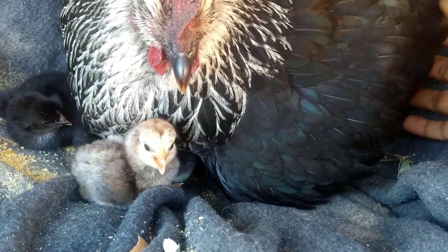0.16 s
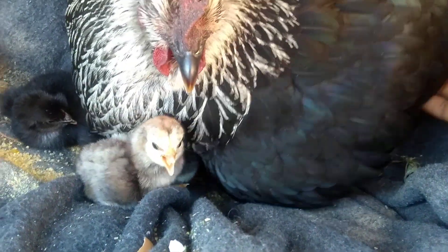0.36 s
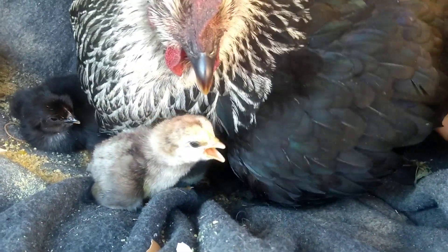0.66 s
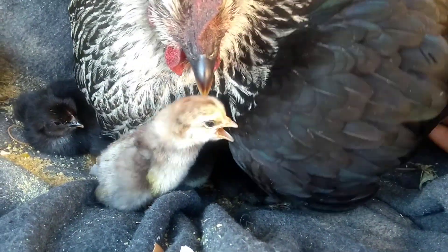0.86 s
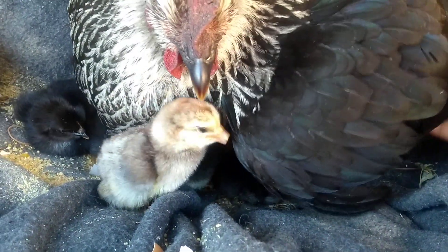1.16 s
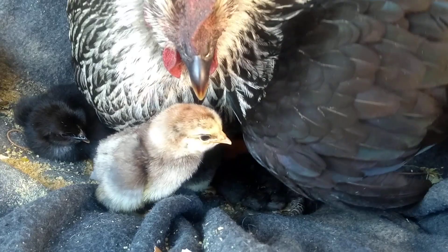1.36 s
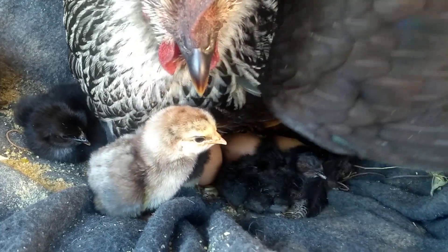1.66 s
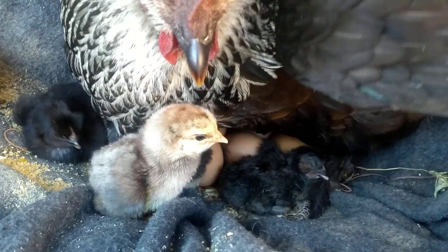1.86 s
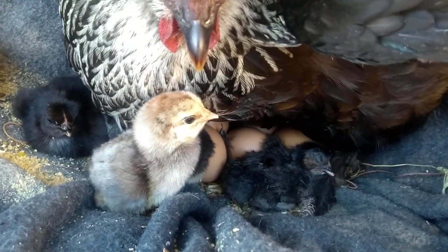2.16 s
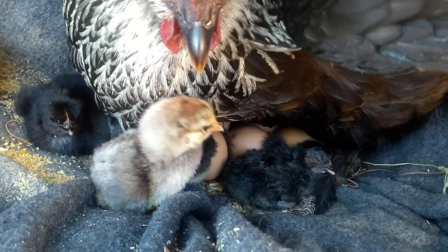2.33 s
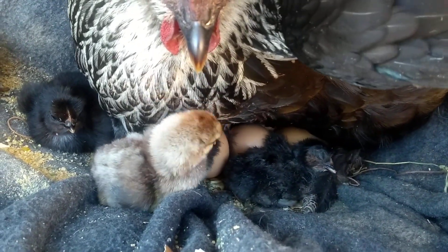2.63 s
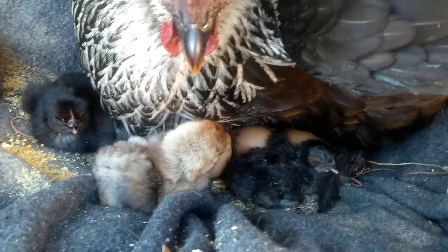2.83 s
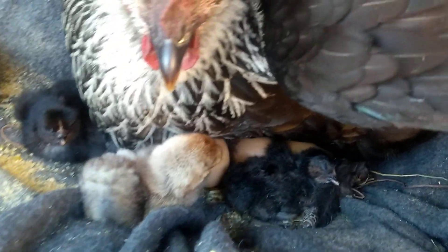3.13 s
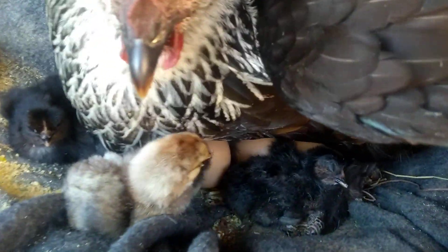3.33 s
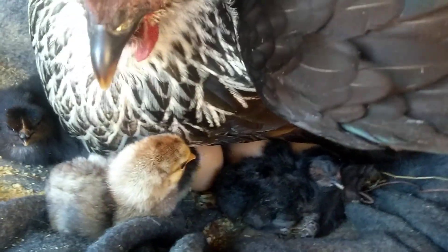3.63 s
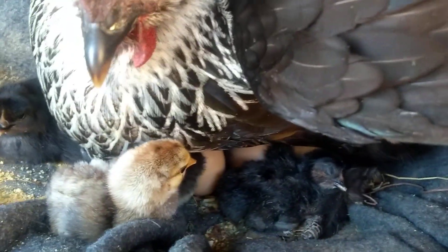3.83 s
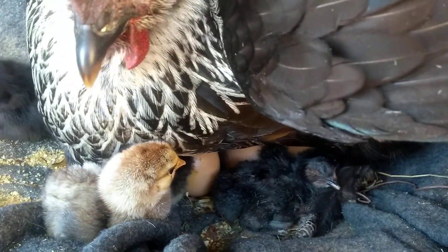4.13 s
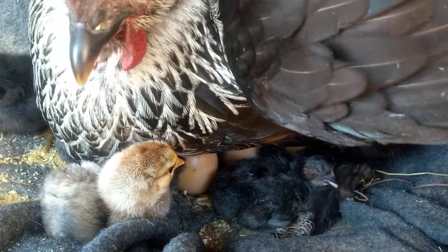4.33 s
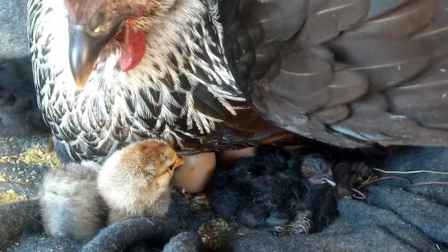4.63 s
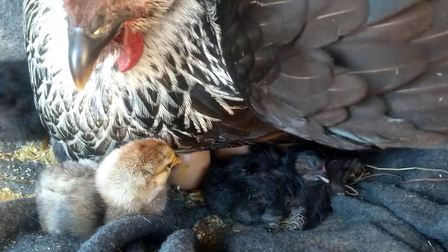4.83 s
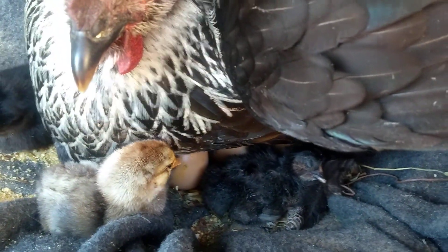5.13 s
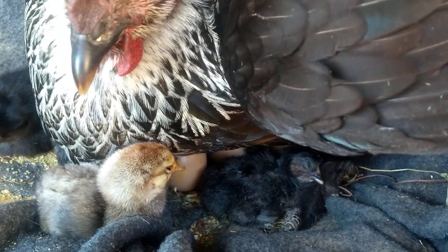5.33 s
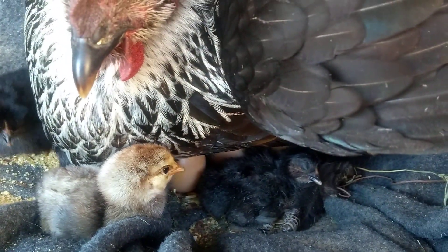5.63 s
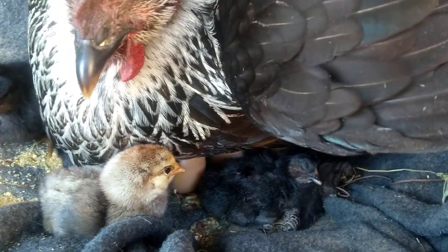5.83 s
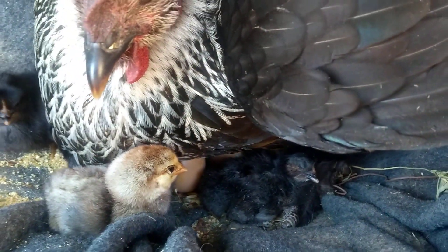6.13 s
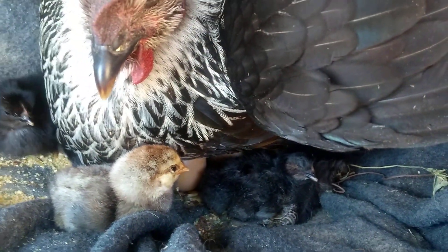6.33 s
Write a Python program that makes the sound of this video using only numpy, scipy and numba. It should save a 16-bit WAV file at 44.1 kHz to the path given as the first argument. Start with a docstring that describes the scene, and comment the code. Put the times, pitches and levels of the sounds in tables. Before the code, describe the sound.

A hen growls five times up close, rough and fluttering, with faint feather rustles and a few tiny chick peeps.

```python
"""Broody hen growling on a blanket

A hen growls five times, close to a phone, while her wing is lifted off her chicks. Each growl is a
train of soft pulses that ring her throat, their rate swinging up and down about 50 times a second.
Feathers rustle in a quiet room, a chick peeps, something nudges the phone, a bird calls far off.
The phone widens the sound of its two ports."""
import sys
import numpy as np
from scipy import signal
from scipy.fft import rfft, irfft, next_fast_len
from scipy.io import wavfile
from scipy.ndimage import uniform_filter1d
from numba import njit

SR = 44100
rng = np.random.default_rng(int(sys.argv[2]) if len(sys.argv) > 2 else 0)


def persist_wave(psi):
    """Save psi, clipped to +-1, as 16-bit WAV."""
    counts = np.round(np.clip(psi, -1, 1) * 32767).astype(np.int16)
    wavfile.write(sys.argv[1], SR, np.atleast_2d(counts).T)


N = 285768
T = np.arange(N) / SR
SIZE = next_fast_len(N + 16384)
FREQS = np.arange(SIZE // 2 + 1) * SR / SIZE
EASY_HZ, EASY_ROUGH = 699.5, 0.58  # top pulse rate and roughness of an easy growl


def undb(db):
    """Decibels to gain."""
    return 10 ** (np.asarray(db) / 20)


def curves(rows):
    """Table columns, interpolated over the times in the first."""
    times_s, *columns = np.transpose(rows)
    return [np.interp(T, times_s, column) for column in columns]


def gains(points):
    """Gain of a (Hz, dB) table at every frequency."""
    hz, db = np.transpose(points)
    return undb(np.interp(np.log(FREQS + 1), np.log(hz), db))


def through(x, response):
    """Filter by a frequency response."""
    return irfft(rfft(x, SIZE) * response, SIZE)[..., :N]


def causal(points):
    """Minimum-phase response of a (Hz, dB) table: rings only after it is struck."""
    cepstrum = irfft(np.log(gains(points)), SIZE)
    cepstrum[1:SIZE // 2] *= 2
    cepstrum[SIZE // 2 + 1:] = 0
    return np.exp(rfft(cepstrum))


def delay(seconds):
    """Response of a plain delay."""
    return np.exp(-2j * np.pi * FREQS * seconds)


def unit(x):
    """Scale to rms 1."""
    return x / np.sqrt(np.mean(x ** 2))


def bell(offset, half_width):
    """Gaussian of height 1."""
    return np.exp(-(offset / half_width) ** 2)


def walk(rate_hz):
    """Smooth random drift, rms 1."""
    step = int(SR / rate_hz)
    knots = rng.standard_normal(N // step + 2)
    drift = np.interp(T * rate_hz, np.arange(len(knots)), knots)
    return unit(uniform_filter1d(drift, step // 2 + 1))


def ports(x, lag_s):
    """A source at the two ports; the right hears it lag_s later."""
    return np.array([x, through(x, delay(lag_s))])


def reverb(x, t60_s):
    """Diffuse tail, different at each port, with the energy of its input."""
    age = T[:SR // 3]
    tail = rng.standard_normal((2, len(age))) * undb(-60 * age / t60_s) * (age > .003)
    return through(x, rfft(tail / np.sqrt(np.sum(tail ** 2) / 2), SIZE))


def clicks(times_s, sizes):
    """Impulses, each shared between two neighbouring samples."""
    at = np.clip(np.asarray(times_s) * SR, 0, N - 2)
    i = at.astype(int)
    return np.bincount(i, sizes * (1 - at % 1), N) + np.bincount(i + 1, sizes * (at % 1), N)


@njit
def resonance(x, hz, width_hz):
    """Band-pass with a moving centre, gain 1 there."""
    y, band, low = np.empty(len(x)), 0., 0.
    for i in range(len(x)):
        g, k = np.tan(np.pi * hz[i] / SR), width_hz / hz[i]
        v = (band + g * (x[i] + 1e-18 - low)) / (1 + g * (g + k))
        band, low, y[i] = 2 * v - band, low + 2 * g * v, k * v
    return y


def note(start_s, length_s, first_hz, last_hz, turn, db, glide=0.076):
    """Pure note that swells, glides and fades; turn and glide are shares of its length."""
    part = np.clip((T - start_s) / length_s, 0, 1)
    on = (part > 0) & (part < 1)
    hz = first_hz + (last_hz - first_hz) * (1 + np.tanh((part[on] - turn) / (2 * glide))) / 2
    swell = np.sin(np.pi * part[on]) ** 2
    tone = np.zeros(N)
    tone[on] = np.sqrt(2) * np.sin(2 * np.pi * np.cumsum(hz) / SR) * swell * undb(db)
    return tone


def growling(scoop_s=.06, sag_s=.055, fall_s=.065, attack_s=0.0026, swell_db_per_s=4, wobble_hz=22):
    """Voice controls. With effort (octaves above EASY_HZ) it clears, flutters deeper and rasps."""
    # Each row: start and end in s, level in dB, top pulse rate in Hz, scoop and sag in octaves, sag
    # time in s, closing fall and flutter depth in octaves, beak opening as treble dB, rasp in dB.
    growls = [(0.0, 0.339, -15, 915, 0.15, 0.6, 0.23, 0.43, 1.23, -3.5, -5.5),
              (0.901, 1.347, -16.5, 731.2, 0.048, 0.19, 1.09, 0.56, 1.396, 1.5, -11.5),
              (1.78, 2.546, -15, 660, 0.12, 0.087, 1.83, 0.49, 1.2, -5, 3.5),
              (3.443, 4.241, -15, 1067, 0.12, .52, 3.75, 1.35, 1.1, -1.5, 11.5),
              (5.428, 5.659, -17, 1040, 0.33, 0.13, 5.65, 0.57, 1.29, -9.5, 9.5)]
    # Surges and lapses of effort. Each row: time in s, half length in s, size in octaves.
    surges = [(0.085, 0.015, .15), (0.158, 0.014, -0.37), (0.188, .01, .25), (0.233, .012, .25),
              (0.271, 0.029, -0.21), (0.937, 0.019, .2), (0.986, 0.025, -.2), (1.02, .012, 0.14),
              (1.092, .02, -0.16), (1.162, 0.016, .3), (1.223, 0.009, 0.41), (1.265, .012, 0.23),
              (1.337, .009, .75), (1.784, 0.013, 0.55), (1.828, 0.026, .42), (1.896, .03, -.1),
              (1.944, 0.011, .25), (1.997, 0.027, -0.2), (2.039, .012, .35), (2.081, 0.011, -.2),
              (2.098, .01, .25), (2.139, 0.03, -.25), (2.204, 0.014, -0.16), (2.225, .012, 0.37),
              (2.282, .014, 0.44), (2.339, .03, -.2), (2.444, .025, 0.32), (3.789, .01, .15),
              (3.834, .007, .25), (3.85, 0.012, -0.71), (3.882, 0.008, .15), (3.917, .02, -.18),
              (3.951, 0.014, 0.24), (3.993, .02, -.15), (4.075, 0.017, .12), (4.168, .04, -0.18)]
    # The flutter slows as a growl runs out of air. Each row: time in s, beat rate in Hz.
    flutter = [(0, 51), (.15, 49), (.34, 45), (.9, 47.6), (1.1, 47.3), (1.35, 44.5), (1.78, 50.8),
               (1.9, 48.3), (2.2, 47.1), (2.55, 46.8), (3.44, 55.8), (3.64, 53), (3.71, 50), (3.85, 48.2),
               (4.24, 47.9), (5.43, 50), (5.6, 49.3), (5.66, 45.5)]
    first_beats_s = [0.0165, 0.9033, 1.7963, 3.4436, 5.447]  # one per growl
    rows = np.array(growls)
    current = np.searchsorted((rows[1:, 0] + rows[:-1, 1]) / 2, T)
    start, end, db, top_hz, scoop, sag, sag_at, fall, depth, beak_db, rasp_db = rows[current].T
    age = np.clip(T - start, 0, end - start)
    remaining = np.clip(end - T, 0, end - start)
    sagged = (1 + np.tanh((T - sag_at) / sag_s)) / 2
    push = np.log2(top_hz / EASY_HZ) - scoop * np.exp(-age / scoop_s)
    push = push - sag * sagged - fall * np.exp(-remaining / fall_s)
    effort = push + sum(octaves * bell(T - s, half_s) for s, half_s, octaves in surges)
    effort = effort + 0.032 * walk(wobble_hz)
    strain = np.maximum(effort, 0)
    return dict(
        sounding=(T >= start) & (T < end),
        first_beat_s=np.array(first_beats_s)[current],
        linger_cycles=-.06 + .12 * strain,  # from a beat to the slackest moment
        db=db - 0.5 * np.exp(-age / attack_s) + swell_db_per_s * age + 0.7 * walk(wobble_hz),
        fast_hz=EASY_HZ * 2 ** effort,
        slow_hz=EASY_HZ * 2 ** (effort - depth - 0.24 * effort),
        flutter_hz=curves(flutter)[0],
        rough=EASY_ROUGH * 2 ** (-0.2 * strain),
        beak_db=beak_db + 19 * push,
        rasp_db=rasp_db + 3.5 * effort)


def pulse_times(rate_hz, beat_clock, lock=.5):
    """One pulse per membrane cycle; each beat draws the nearest pulse toward itself."""
    phase = np.cumsum(rate_hz) / SR
    at_beats = phase[np.flatnonzero(np.diff(np.floor(beat_clock)) == 1)]
    pulls = [0]
    for p in at_beats:
        pulled = p + pulls[-1]
        pulls.append(pulls[-1] + lock * (np.round(pulled) - pulled))
    phase = phase + np.interp(phase, at_beats, pulls[1:])
    return np.interp(np.arange(1, int(phase[-1])), phase, T)


def syrinx(control, lean=.35, jitter=0.1, shimmer=2.38, beat_db=5.5, beat_rasp_db=5, limit_hz=920):
    """Membrane pulses swinging between slow, strong knocks and a fast tone; also their rasp drive."""
    # The voice catches briefly. Each row: time in s, depth in dB.
    catches = [(0.216, -7.5), (1.044, -11.5), (1.173, -18), (1.278, -9), (1.791, -5), (1.953, -10),
               (2.464, -21), (4.222, -9.5), (5.435, -3.5), (5.454, -28), (5.492, -20)]
    slow_hz, fast_hz, rough = control["slow_hz"], control["fast_hz"], control["rough"]
    clock = np.cumsum(control["flutter_hz"]) / SR
    clock = clock - np.interp(control["first_beat_s"], T, clock) + .04 * rough * walk(50)
    cycles = (clock + .5) % 1 - .5  # from the nearest beat
    # The membranes tighten quickly and slacken more slowly.
    turn = 2 * np.pi * (cycles - control["linger_cycles"])
    tension = (.5 - .5 * np.cos(turn + lean * (1 - np.cos(turn)))) * (1 + .18 * rough * walk(50))
    rate_hz = slow_hz * (fast_hz / slow_hz) ** tension * np.exp(jitter * rough * walk(300))
    times_s = pulse_times(rate_hz, clock)
    i = (times_s * SR).astype(int)
    # Each beat: a lull, then two or three strong pulses.
    lull_db = -1.5 * bell(cycles[i] + 0.19, 0.18) * (rough[i] / EASY_ROUGH) ** 2
    beat = np.exp(-((cycles[i] - 0.043) / .14) ** 4)
    catch_db = sum(db * bell(times_s - s, 0.0041) for s, db in catches)
    db = control["db"][i] + beat_db * beat + lull_db + catch_db + shimmer * (rough * walk(400))[i]
    # Above limit_hz the membranes barely open.
    opening = (rate_hz / slow_hz) ** -0.067 / np.sqrt(1 + (rate_hz / limit_hz) ** 6)
    sizes = control["sounding"][i] * undb(db) * opening[i]
    return clicks(times_s, sizes), clicks(times_s, sizes * undb(beat_rasp_db * beat))


def hen(voice_db=32, croak_db=35, lower_width_hz=65., upper_width_hz=80., beak_hz=1050, rasp_db=-32):
    """Pulses ring the throat, an open beak brightens it, and each pulse lets out a trace of rasp."""
    # Throat with closed beak, and the rasp after a pulse. Each row: frequency in Hz, gain in dB.
    throat_curve = [(40, -46.5), (100, -16), (160, 2.5), (270, -5.5), (380, -4.5), (520, 0.5), (660, -3.5),
                    (840, -4), (1020, -15.5), (1200, -29.5), (1360, -26), (1510, -33.5), (1640, -40),
                    (2050, -75.5), (5000, -92)]
    rasp_curve = [(1000, 5), (1800, 3.5), (2400, -15), (2850, 2.5), (3200, 9), (3600, -16), (4000, -9.5),
                  (4400, 3), (5000, -13), (6000, -23.5), (9000, -29), (14000, -27.5)]
    # Two narrow ringing tones waver up and down through each growl.
    # Each row: time in s, lower centre in Hz and strength in dB, upper centre in Hz and strength in dB.
    wavering_peaks = [(.02, 567, -7.5, 817, -5.5), (.08, 660, -11.5, 849, 2), (.14, 606, -1, 769, -0.5),
                      (.2, 634, -1.5, 752, -13.5), (.26, 500, -1.5, 811, -2), (.33, 508, -15.5, 881, 2),
                      (.93, 625, -5.5, 870, -5.5), (1, 491, -6.5, 837, -3.5), (1.07, 493, -3.5, 796, -2.5),
                      (1.13, 457, -5, 774, 0.5), (1.2, 480, -0.5, 768, -1.5), (1.26, 454, -2, 830, -8),
                      (1.33, 449, -6.5, 865, 4.5), (1.82, 574, -1.5, 756, -5), (1.88, 574, -1, 834, -11),
                      (1.96, 502, -7.5, 811, -6.5), (2.02, 501, -2, 784, -8.5), (2.08, 505, -2.5, 830, -5),
                      (2.14, 497, 0, 887, -3), (2.21, 491, 0, 897, -13), (2.25, 520, 0, 780, -10),
                      (2.28, 632, -6.5, 731, -3), (2.33, 492, -2, 795, -7.5), (2.41, 498, -1, 790, -4.5),
                      (2.47, 474, -0.5, 929, -4), (2.53, 473, -7, 805, -1.5), (3.47, 518, 1, 928, -6.5),
                      (3.56, 511, -4.5, 972, -9), (3.66, 523, -6, 943, -9.5), (3.73, 554, -2.5, 932, -7),
                      (3.8, 624, -7, 814, -3), (3.85, 549, -1, 832, -12), (3.89, 561, -6.5, 803, -6),
                      (3.95, 649, -5, 828, -1), (3.99, 538, -2.5, 737, -13.5), (4.04, 656, 1, 721, -8),
                      (4.09, 580, 0.5, 777, -2.5), (4.14, 479, -1.5, 725, -11), (4.22, 467, 1.5, 798, -4.5),
                      (5.46, 506, -5.5, 833, -6), (5.53, 514, -12, 830, -3), (5.59, 496, -3.5, 823, -5),
                      (5.65, 609, -4, 778, -0.5)]
    lower_hz, lower_db, upper_hz, upper_db = curves(wavering_peaks)
    lower, upper = undb(lower_db), undb(upper_db)
    control = growling()
    pulses, rasp_drive = syrinx(control)
    pulses = pulses * undb(voice_db)
    slack = croaks() * undb(croak_db)
    throat = causal(throat_curve)
    voice = through(pulses, throat)
    rings = lower * resonance(voice, lower_hz, lower_width_hz)
    rings += upper * resonance(voice, upper_hz, upper_width_hz)
    voice = (voice + rings) / np.sqrt(1 + lower + upper / 2)
    voice += through(slack, throat)  # croaks lack the ringing tones
    treble = undb(control["beak_db"]) * through(voice, 1 - 1 / (1 + (FREQS / beak_hz) ** 10))
    rasp = undb(rasp_db + control["rasp_db"]) * through(rasp_drive, causal(rasp_curve))
    return voice + treble + rasp + chest(pulses + slack) + squeak()


def chest(pulses):
    """Low, slow-dying body resonances under the voice."""
    # Each row: centre in Hz, width in Hz, gain in dB.
    modes = [(181, 5.4, -21), (268, 14, -10)]
    response = sum(undb(db) * 1j * FREQS * width / (hz ** 2 - FREQS ** 2 + 1j * FREQS * width)
                   for hz, width, db in modes)
    return through(pulses, response)


def hen_at_ports(voice, room_db=-30):
    """Her head moves left; body and wing colour the right port; bedding soaks up most of the echo."""
    # Each row: time in s, lead of the left port in ms, left minus right in dB.
    head = [(2.6, 0.09, 6), (3.45, 0.15, 8.5), (3.8, 0.19, 7)]
    # Path to the right port. Each row: frequency in Hz, gain in dB, phase in radians.
    shade = [(150, 4, -0.0038), (397, 3, -0.088), (520, 4, 0.16), (660, 2.5, .15), (780, 6, -0.43),
             (900, 3, -0.069), (1073, 8, -0.39), (1320, -3.5, -.6), (1450, 6.5, -1.4), (1600, -3.5, -1.7),
             (1900, -2, -1.6), (4000, 1, -.1)]
    lead_ms, left_db = curves(head)
    hz, db, phase = np.transpose(shade)
    right = np.interp(T - lead_ms / 1000, T, voice) * undb(-left_db)
    right = through(right, gains(np.c_[hz, db]) * np.exp(1j * np.interp(FREQS, hz, phase)))
    return np.array([voice, right]) + undb(room_db) * reverb(voice, t60_s=.28)


def room(waver_db=1, whine_hz=3680, whine_width_hz=100, whine_db=-81.5, whine_waver_db=4.0):
    """Quiet air, its low hum alike at both ports, and a thin whine that comes and goes."""
    # Each row: frequency in Hz, noise density in dB.
    air_spectrum = [(25, -95.5), (50, -76), (85, -70), (120, -80.5), (160, -75), (230, -85.5), (330, -89),
                    (600, -93.5), (1200, -101), (2000, -104), (3600, -108), (5000, -111), (9000, -114),
                    (14000, -116)]
    # Each row: frequency in Hz, side minus mid in dB.
    side_curve = [(30, 1.5), (75, -11), (170, -10), (600, 0)]
    mid, side = through(rng.standard_normal((2, N)), gains(air_spectrum) * np.sqrt(SR / 2))
    side = through(side, gains(side_curve))
    air = np.array([mid + side, mid - side]) * undb(waver_db * walk(2.334))
    whine_band = 1 / (1 + (2 * (FREQS - whine_hz) / whine_width_hz) ** 2)
    whine = unit(through(rng.standard_normal(N), whine_band))
    return air + undb(whine_db + whine_waver_db * walk(5.4)) * whine


def feathers(rustle_db=2, right_db=5, bright_hz=7000, held_db=-65, resting_db=-68, held_until_s=2.3):
    """Barbs slide over cloth in tiny grains, swell with each wing stroke, then settle."""
    # Each row: frequency in Hz, gain in dB.
    grain_spectrum = [(200, 8.5), (800, 1), (2000, -4), (4000, 1), (6000, 2), (9000, -2), (12000, -2.5),
                      (14500, -8)]
    # Each row: peak time in s, half length in s, level in dB, extra dB above bright_hz.
    strokes = [(0.263, 0.016, -65.5, 5.5), (0.388, 0.022, -65, 7), (0.498, 0.048, -52.5, -0.5),
               (0.761, 0.031, -55.5, 8), (0.968, 0.051, -61.5, 6), (1.193, 0.014, -62.5, 6),
               (1.276, 0.02, -62, 4), (1.792, 0.025, -55.5, 1.5), (1.963, .04, -61, -3),
               (3.146, 0.037, -56, 3.5), (3.243, 0.027, -63.5, 8.5)]
    friction = rng.standard_normal((2, N)) * undb(walk(820) + 1.7 * walk(77))
    grains = unit(through(friction, gains(grain_spectrum)))
    dull = through(grains, 1 / (1 + (FREQS / bright_hz) ** 6))
    held = (1 - np.tanh((T - held_until_s) / .12)) / 2
    dull_power = bright_power = (undb(held_db) * held) ** 2 + undb(resting_db) ** 2
    for s, half_s, db, bright_db in strokes:
        power = undb(db) ** 2 * bell(T - s, half_s)
        dull_power = dull_power + power
        bright_power = bright_power + power * undb(bright_db) ** 2
    rustle = dull * np.sqrt(dull_power) + (grains - dull) * np.sqrt(bright_power)
    return rustle * undb(rustle_db + np.array([[-right_db], [right_db]]) / 2)


def croaks(rate_hz=239, fade_db_per_s=600):
    """Slack membranes: a lone pulse leads into a growl, a few fading ones trail it."""
    # Each row: start in s, length in s, relative level in dB.
    bursts = [(0.36, .005, -34.5), (.8676, .002, -26), (1.358, .009, -23), (1.7396, .002, -27.5),
              (2.5635, .005, -16), (3.4022, .002, -23), (5.3967, .002, -22.5), (5.6756, .009, -18)]
    pulses = 0
    for s, length_s, db in bursts:
        age = np.arange(0, length_s, 1 / rate_hz)
        pulses += clicks(s + age, undb(db - fade_db_per_s * age))
    return pulses


def chick(peep_db=-2, room_db=-15):
    """Tiny peeps that scoop upward."""
    # Each row: start and length in s, first and last pitch in Hz, share before the glide, level in dB.
    notes = [(0.472, 0.023, 2850, 2960, 0.5, -54), (1.519, 0.029, 2510, 3350, 0.4, -50),
             (2.143, 0.036, 2690, 3400, 0.75, -41), (4.354, 0.033, 3206, 4400, 0.78, -41.5)]
    peeps = undb(peep_db) * sum(note(*row) for row in notes)
    return ports(peeps, lag_s=.00006) + undb(room_db) * reverb(peeps, t60_s=0.11)


def nest_knocks():
    """Small knocks in the nest, each a damped sine."""
    # Each row: start in s, pitch in Hz, decay in s, level in dB.
    knocks = [(0.523, 1230, 0.0015, -51), (0.555, 1540, 0.00079, -39), (1.302, 4560, 0.0019, -39)]
    sound = 0
    for s, hz, decay_s, db in knocks:
        age = np.maximum(T - s, 0)
        sound += undb(db) * np.sin(2 * np.pi * hz * age) * np.exp(-age / decay_s)
    return ports(sound, lag_s=.00009)


def squeak():
    """A thin squeak arches into the third growl."""
    # Each row: start and length in s, first and last pitch in Hz, share before the glide, level in dB.
    notes = [(1.754, 0.022, 900, 1230, .3, -44), (1.767, 0.022, 1288, 890, 0.4, -42)]
    return sum(note(*row) for row in notes)


def bump(start_s=2, level_db=-16, first_hz=230, last_hz=65, sink_s=0.0061, peak_s=0.0049):
    """A nudge on the phone: a soft thud of sinking pitch, mostly at the left port."""
    age = np.maximum(T - start_s, 0)
    hz = last_hz + (first_hz - last_hz) * np.exp(-age / sink_s)
    envelope = age / peak_s * np.exp(1 - age / peak_s)
    thud = np.sin(2 * np.pi * np.cumsum(hz * (age > 0)) / SR) * envelope
    return undb(level_db) * thud * np.array([[1], [-0.18]])


def far_bird(level_db=-1, echo_db=-6, blur=0.27, pitch_spread=0.02):
    """One faint rising call from the right, repeated at varying pitch, blurred by distance."""
    # Each row: start in s, level in dB.
    calls = [(2.74, -70.5), (3.06, -66.5), (4.27, -68), (4.735, -63), (5.23, -64.5), (5.775, -63),
             (6.25, -62.5)]
    # Each row: offset and length in s, first and last pitch in Hz, share before the glide, level in dB.
    notes = [(-.03, 0.17, 458, 481, .5, 0.5), (0, 0.193, 520, 664.6, .36, 2),
             (0.179, 0.17, 743, 780, 0.4, -9.5)]
    song = 0
    for s, db in calls:
        pitch = 1 + pitch_spread * rng.standard_normal()
        for offset_s, length_s, first_hz, last_hz, turn, note_db in notes:
            song += note(s + offset_s, length_s, first_hz * pitch, last_hz * pitch, turn,
                         db + note_db, glide=0.16)
    echo = reverb(song, t60_s=0.64)
    return undb(level_db) * (ports(song + blur * echo[0], lag_s=-0.00027) + undb(echo_db) * echo)


def scene():
    """All sources at the two ports."""
    return hen_at_ports(hen()) + chick() + far_bird() + feathers() + nest_knocks() + bump() + room()


def record(dry, port_gap_s=0.000404, top_hz=14300):
    """Each channel subtracts the other port, delayed by their spacing: a wider image. The top is cut."""
    # Each row: frequency in Hz, gain of the opposite port in dB.
    crossfeed = [(30, 1.5), (1000, 0.14), (2600, 0.5), (5000, -7), (8000, -12.5), (14000, -21)]
    wide = dry - through(dry[::-1], gains(crossfeed) * delay(port_gap_s))
    return signal.sosfilt(signal.ellip(10, .2, 70, top_hz, fs=SR, output="sos"), wide)


dry = scene()
out = record(dry)
persist_wave(out)
```